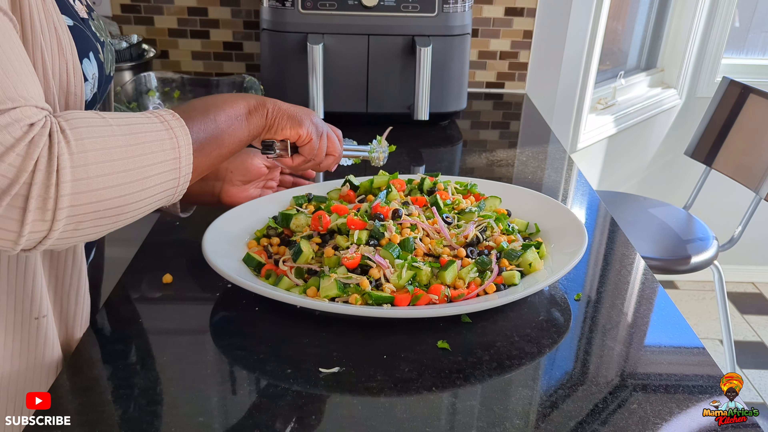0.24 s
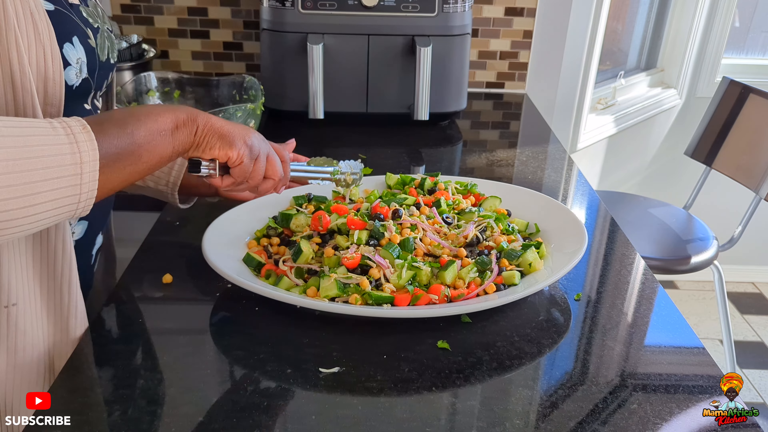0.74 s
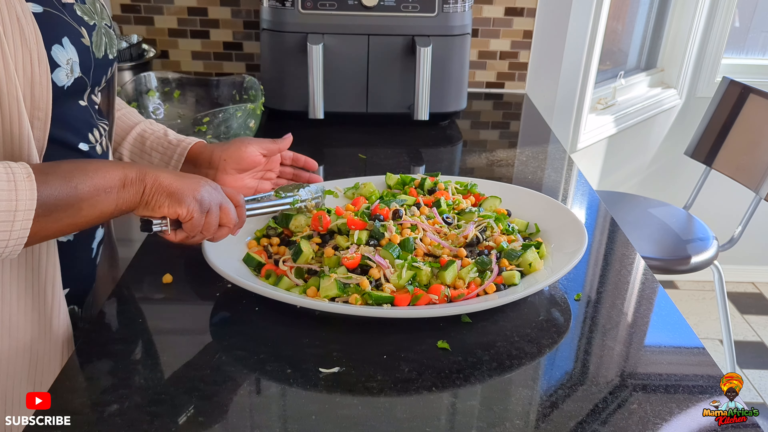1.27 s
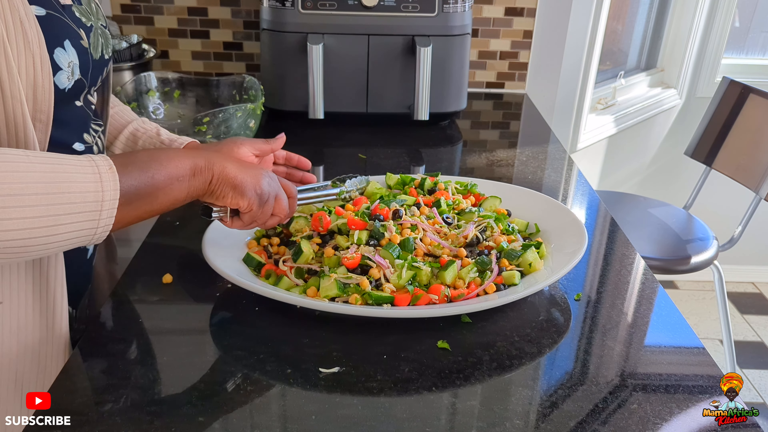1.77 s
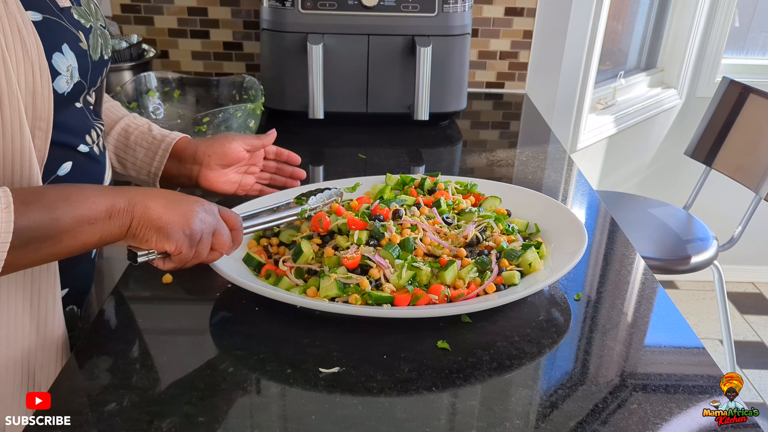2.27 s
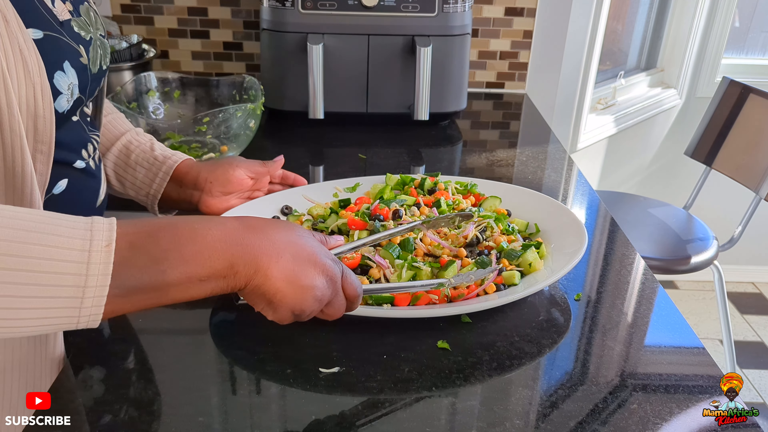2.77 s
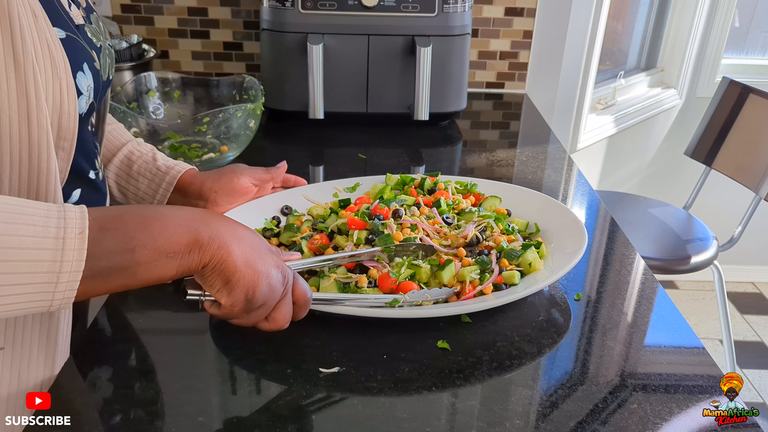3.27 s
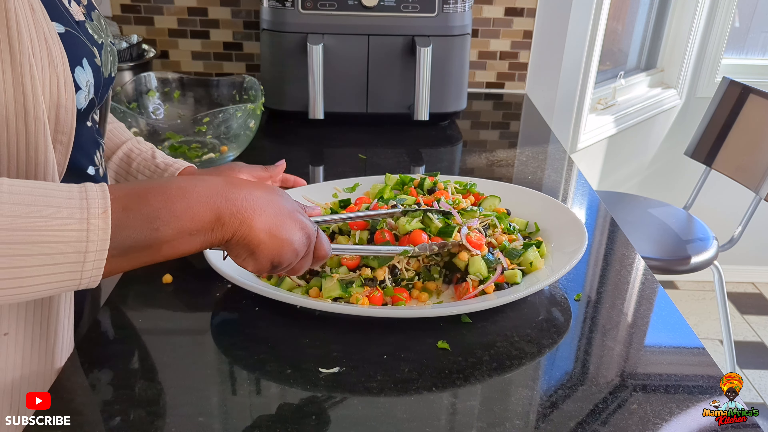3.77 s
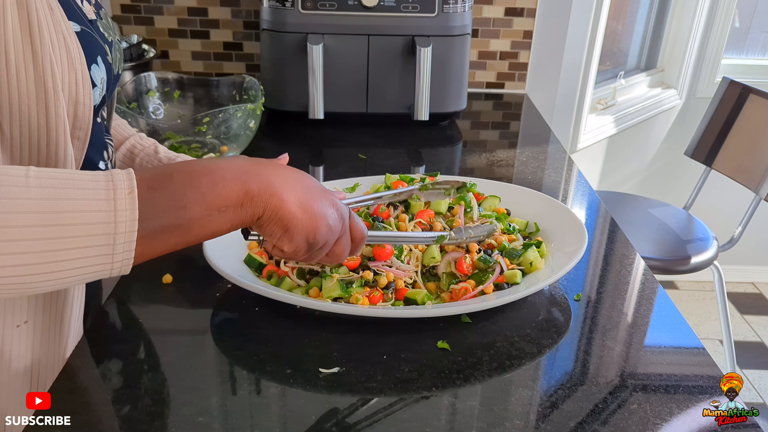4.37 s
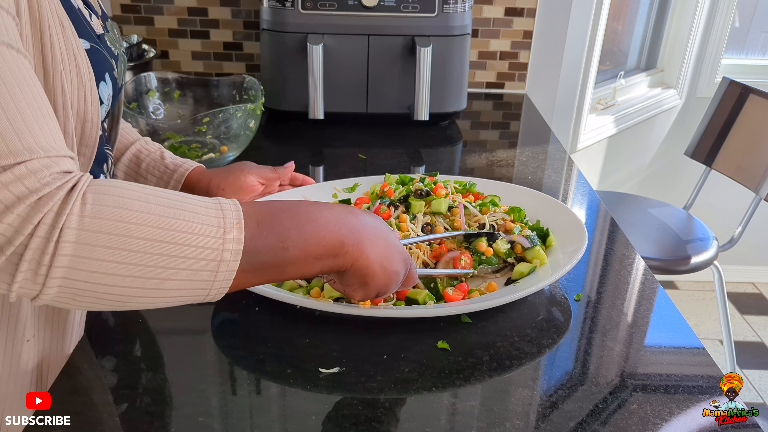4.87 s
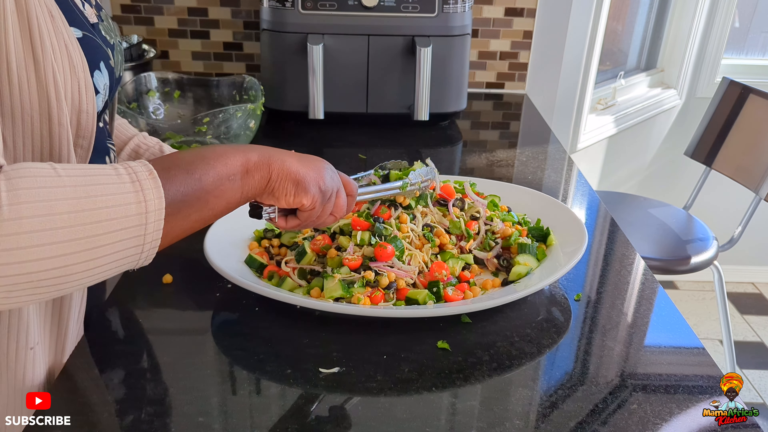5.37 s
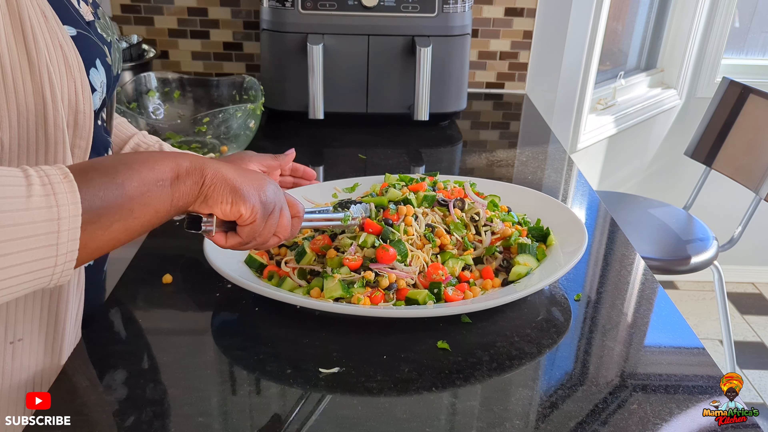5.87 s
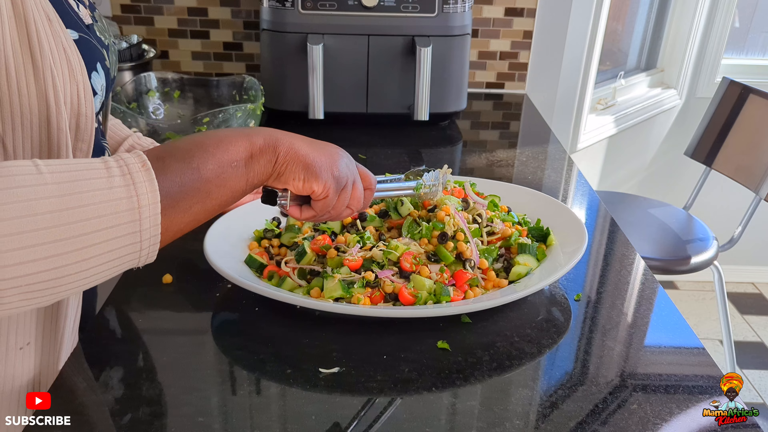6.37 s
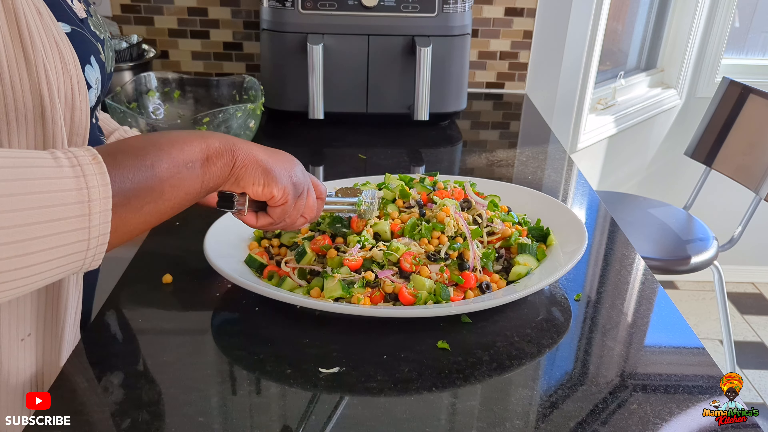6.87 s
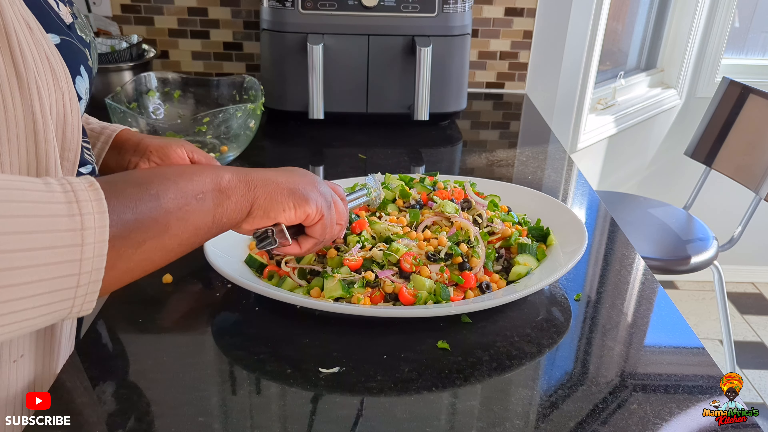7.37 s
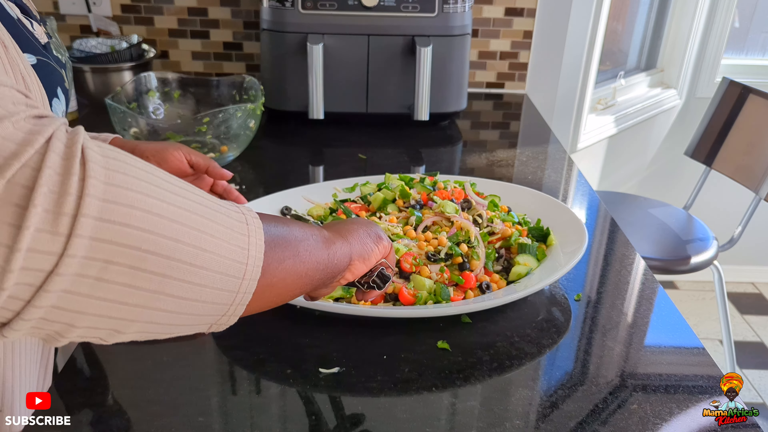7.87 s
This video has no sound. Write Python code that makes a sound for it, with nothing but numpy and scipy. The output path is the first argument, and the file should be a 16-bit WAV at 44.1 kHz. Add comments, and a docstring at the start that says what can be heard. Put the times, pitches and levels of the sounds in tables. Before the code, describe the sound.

Quiet kitchen rumble with sparse tong clicks and muted platter knocks, a sharp ceramic clank just after three seconds, then small ticks and rustles.

```python
"""A low household rumble and a faint hiss run throughout, while wet leaves rustle in short pushes of tiny ticks.
Steel tongs toss the salad on a ceramic platter in a hard-walled kitchen, close to the microphone.
Soft knocks on the platter are decaying tones plus a dull thud; tong clicks are noise bursts coloured by steel.
Once the tongs clank down hard, and now and then a wet vegetable squeaks: a short burst of noise around one pitch.
The room answers every knock and click with dense, quickly fading reflections."""
import sys
import numpy as np
from scipy import signal
from scipy.fft import rfft, irfft, next_fast_len
from scipy.io import wavfile
from scipy.ndimage import map_coordinates

SR = 44100
rng = np.random.default_rng(int(sys.argv[2]) if len(sys.argv) > 2 else 0)


def generate_wav(signal):
    """Clip the signal to [-1, 1] and save it as 16-bit WAV at the path in sys.argv[1]."""
    frames = np.transpose(np.atleast_2d(signal))
    scaled = np.clip(frames, -1, 1) * 32767
    pcm = np.round(scaled).astype(np.int16)
    wavfile.write(sys.argv[1], SR, pcm)


N = 358533

# Rise and fall of the rumble, before its overall boost and waver: [t/s, level/dB]
RUMBLE_LEVEL = [(0.0, -65), (0.36, -62), (1.04, -65), (1.63, -62), (2.29, -64), (2.4, -64), (2.58, -69.5),
                (3.46, -62), (3.82, -66), (6.2, -67), (6.59, -69.5), (7.36, -65), (7.74, -69),
                (8.13, -63.5)]
# Spectrum of the rumble, relative: [f/Hz, level/dB per Hz]
RUMBLE_SPECTRUM = [(15, -62), (25, -38), (33, -22), (42, -9), (56, 1), (76, -2.5), (102, -11.5),
                   (135, -3.5), (165, -15), (200, -18.5), (240, -13.5), (285, -30), (370, -27.5),
                   (500, -25), (1000, -81)]
# Spectrum of the faint steady hiss, relative: [f/Hz, level/dB per Hz]
HISS_SPECTRUM = [(180, -35), (300, -1), (331, -5.5), (398, -1), (614, -8), (678, -5), (915, -12),
                 (994, -9.5), (1530, -14.5), (2700, -18.5), (2980, -17), (11000, -28.5), (16000, -37.5)]
# How alike left and right are in sound from all around: [f/Hz, likeness/0 to 1]
LEFT_RIGHT_LIKENESS = [(60, .94), (250, .88), (600, 0.56), (1200, 0), (2500, 0), (5000, 0)]
# Time the room takes to fade by 60 dB: [f/Hz, fade time/s]
ROOM_FADE = [(150, .4), (700, .44), (2000, .45), (4500, .43), (8000, .36), (14000, .33)]

# The tongs push through the leaves or let them drop:
# [start t/s, length/s, rustle level/dB, crisp treble relative to the rustle/dB]
RUSTLES = [ (0.0, 0.076, -75, -37), (0.29, 0.17, -76, -11), (0.543, 0.077, -80, -34),
           (0.79, 0.04, -82, -11), (0.851, 0.023, -71.5, -7.5), (2.115, 0.081, -77, -7.5),
           (2.244, 0.051, -72, -18), (2.4, 0.18, -85.5, -20), (3.769, 0.034, -78.5, -20),
           (3.9, 0.41, -83, -22), (4.486, 0.1, -78.5, -12), (4.611, 0.14, -77.5, 5),
           (4.759, 0.12, -75.5, 6), (5.055, 0.088, -77.5, -7), (6.32, 0.15, -84, -12),
           (6.604, 0.22, -78.5, -7.5), (7.09, 0.069, -83.5, -12), (7.723, 0.013, -87.5, 3),
           (7.859, 0.079, -80, 0), (7.973, 0.11, -83.5, -7)]
# Spectrum of the rustling leaves, relative: [f/Hz, level/dB per Hz]
LEAF_SPECTRUM = [(500, 0.5), (900, -7), (1300, -8), (2100, 4.5), (2700, -3), (3400, -9), (4500, -6),
                 (5600, -9), (6500, -4.5), (7300, -16.5), (11000, -36), (15000, -52)]
# Spectrum of the crisp snaps, relative: [f/Hz, level/dB per Hz]
CRISP_SPECTRUM = [(5000, -20), (9000, -16.5), (13000, -18.5), (16000, -16.5)]

# The platter is struck, mostly cushioned by food:
# [t/s, level/dB, highest pitch the contact excites f/Hz, extra rim bending/dB]
KNOCKS = [(0.338, -65, 800, 9.5), (0.555, -62, 950, 20), (0.789, -56.5, 790, 8.5), (0.878, -62.5, 750, -3),
          (1.106, -67.5, 854, -2), (1.2365, -51.5, 8950, 2), (1.663, -48, 770, 3.5), (1.75, -54.5, 696, 12),
          (2.165, -63, 746, 3), (2.269, -63.5, 850, 8.5), (3.2795, -34.5, 1749, -2.5),
          (3.898, -68.5, 941, 0), (5.0437, -48.5, 1084, -2), (6.262, -58, 860, 2), (6.334, -65, 780, -3),
          (6.43, -73.5, 796, 2)]
# Ring of the ceramic platter, relative: [f/Hz, level/dB, time to fade by 60 dB/s]
PLATTER_MODES = [(172, -14, .2), (558, -12, .32), (641, -1.5, .24), (668, -6, .15), (893, 0, .23),
                 (1290, -7, .26), (1760, 1.5, .4), (2293, 9.8, .38), (2891, 9.8, .33), (3560, -5, .25),
                 (3967, -5, .24), (4953, 1, .38), (6223, 0, .18), (6611, -3, .32)]

# The tongs meet each other, the platter or crisp vegetables. Light contacts lack the lows, sharp ones
# tilt to the treble: [t/s, relative strength/dB, low edge f/Hz, tilt/dB per octave,
# flexing of the arms/dB, direct sound over room/dB, relative ring of the arms/dB]
CLICKS = [ (0.7957, -37.5, 600, -2, -3, -1, 7), (0.8868, -33.5, 400, -3, -5.5, 4.5, -8),
          (1.2359, -3.5, 326, 0.4, -6.5, 2, -27), (1.666, -44, 504, -3, -1, -8, 1),
          (1.7402, -15.5, 370, 0.6, -5, 1, 0.5), (3.2797, 12.5, 830, -2.5, -0.5, -3.5, 0.5),
          (3.3592, 2.5, 2800, -0.5, -5, 18, -13), (4.496, -43, 500, -4.5, -12, 9, -11),
          (4.5324, -35.5, 400, -1, -22, -3, -11), (4.629, -30, 3500, 3.5, -12, -4, 4),
          (4.787, -18.5, 3260, 2, -17, -14.5, -11), (5.8636, -4, 1560, 0.5, 4, 4, -7),
          (6.098, -38, 900, -1, -1.5, 0, -12), (6.6097, -32, 2800, -1, -7, 1.5, -15),
          (6.75, -35.5, 2010, -1.5, -5, 6, -1), (7.196, -39, 3500, -0.5, 1, -2, -10),
          (7.47, -23.5, 300, 8.5, -4, 2, -1), (8.1055, -38.5, 2980, 0, -8, -0.5, -5.5)]
# Broad resonances of the hand-damped tongs: [f/Hz, width/Hz, level/dB]
TONG_RESONANCES = [(930, 110, 2.5), (1100, 400, 4), (1406, 200, -7.5), (1720, 120, 7), (2123, 430, 14),
                   (2740, 140, 2), (3270, 260, 1.5), (4300, 150, 0.5), (5180, 1100, 0.5), (5320, 340, 4.5),
                   (6480, 1000, 7.5), (7200, 150, -5.5), (8240, 2400, 4), (10860, 190, 3.5),
                   (13600, 1200, 4)]
# Free ring of the steel arms, relative: [f/Hz, level/dB, time to fade by 60 dB/s]
ARM_MODES = [(1125, -5, .3), (1712, 1, .33), (1852, -3, .33), (1907, -2, .37), (2041, -2, .37),
             (2098, 1, .37), (2232, -3, .37), (2331, -4, .36), (2450, -7, .32), (2783, -9, .35),
             (2827, -6, .3), (3188, -3, .33), (3272, -4, .3), (3812, -6, .3), (4263, -3, .35),
             (4790, -6, .28), (4861, -4, .28), (5168, -6, .29), (5346, -4, .3), (5772, -6, .32),
             (6476, -6, .3), (7332, -2, .17), (8333, -5, .28)]
# Push of steel on something hard, shared by all clicks: [f/Hz, level/dB]
CONTACT_SPECTRUM = [(470, -0.5), (1050, -1), (2100, 0), (3200, 0), (4700, -0.5), (6300, -5), (8400, -6),
                    (12500, -11.5), (16000, -13.5)]

# A wet vegetable slips on the steel: [t/s, level/dB, pitch f/Hz]
SQUEAKS = [(2.234, -69, 2970), (2.29, -71, 2000), (4.631, -61.5, 3460)]

RUSTLE_ATTACK_S = 0.007  # the leaves start to slip
SETTLE_DB_PER_S, CRISP_SETTLE_DB_PER_S = 111, 170  # after a push the crisp snaps die away faster
SLIP_DB, SLIPS_PER_S = 2.5, 45  # the leaves stick and slip unevenly under the tongs
TILT_PIVOT_HZ = 4000  # the tilt of a click turns about this pitch
CHATTER_S = 0.003  # steel chatters on steel, fading with this time constant
FLEX_HZ, FLEX_OCTAVES = 1830, 0.24  # where the arms flex most easily: centre, half width
TOP_HZ = 15600  # highest pitch kept in the sound


def amp(db):
    """Turn decibels into a gain."""
    return 10 ** (np.asarray(db) / 20)


def unit(x):
    """Scale a sound to an rms of 1."""
    return x / np.sqrt(np.mean(x ** 2) + 1e-20)


def unit_energy(pair):
    """Scale a stereo sound to an average energy of 1 per channel."""
    return pair / np.sqrt(np.sum(pair ** 2) / 2)


def along(points, hz):
    """Read a curve of (Hz, value) points, spaced by pitch, at any frequency."""
    point_hz, value = np.transpose(points)
    return np.interp(np.log(hz + 1), np.log(point_hz + 1), value)


def filtered(x, response):
    """Multiply each frequency of x by the gain that response gives for it."""
    n = x.shape[-1]
    size = next_fast_len(n + SR // 5)
    gain = response(np.fft.rfftfreq(size, 1 / SR))
    return irfft(rfft(x, size) * gain, size)[..., :n]


def struck(x, colour_db, size=32768):
    """Colour a blow so that the body answers only after it, never before."""
    cepstrum = irfft(np.log(amp(colour_db(np.fft.rfftfreq(size, 1 / SR)))))
    # folding this onto positive time makes the filter minimum-phase
    cepstrum[1:size // 2] *= 2
    cepstrum[size // 2 + 1:] = 0
    response = np.exp(rfft(cepstrum))
    return irfft(rfft(x, size) * response)[..., :x.shape[-1]]


def diffuse(pair):
    """Blend two unrelated signals into sound from all around, alike left and right in the bass."""
    def mid_side_gains(hz):
        angle = np.arccos(np.clip(along(LEFT_RIGHT_LIKENESS, hz), -1, 1)) / 2
        return np.array([np.cos(angle), np.sin(angle)])

    mid, side = filtered(pair, mid_side_gains)
    return np.array([mid + side, mid - side])


def coloured(pair, spectrum):
    """Make diffuse stereo sound of rms 1 with the given spectrum."""
    return unit(filtered(diffuse(pair), lambda hz: amp(along(spectrum, hz))))


def add(track, s, sound):
    """Mix a sound into the track from time s, cutting it at the end of the track."""
    part = track[:, round(s * SR):][:, :sound.shape[1]]
    part += sound[:, :part.shape[1]]


def wobble(rate):
    """Draw a smooth random curve through this many random points a second."""
    return map_coordinates(rng.standard_normal(400), [np.arange(N) * rate / SR], mode="mirror")


def kitchen(build_s=0.0017):
    """The room's answer from one spot: dense reflections, each frequency dying at its own speed."""
    noise = diffuse(rng.standard_normal((2, SR * 2 // 3)))
    hz, t, bins = signal.stft(noise, SR, nperseg=256)
    fade = amp(-60 * t / along(ROOM_FADE, hz)[:, None])
    tail = signal.istft(bins * fade, SR, nperseg=256)[1]
    build_up = 1 - np.exp(-np.arange(tail.shape[1]) / SR / build_s)
    return unit_energy(tail * build_up)


def ring(modes, t, scatter_db, spread_hz):
    """Add up fading tones of random strength; higher ones differ more in phase left to right."""
    hz, db, fade_s = np.transpose(modes)[:, :, None]
    level, phase, skew = rng.standard_normal((3, len(modes), 1))
    skew = skew * np.minimum(hz / spread_hz, 1)
    fade = amp(db + scatter_db * level - 60 * t / fade_s)
    turns = 2 * np.pi * (hz * t + phase)
    return np.array([np.sum(fade * np.sin(turns + side * skew), axis=0) for side in (-1, 1)])


def house(rumble_db=2, waver_db=0.7, waver_per_s=7, hiss_db=-77):
    """A low wavering rumble and a faint even hiss, both shaped from noise, fill the kitchen."""
    times, levels = np.transpose(RUMBLE_LEVEL)
    level_db = np.interp(np.arange(N) / SR, times, levels) + rumble_db
    level_db = level_db + waver_db * wobble(waver_per_s)
    rumble = amp(level_db) * coloured(rng.standard_normal((2, N)), RUMBLE_SPECTRUM)
    hiss = amp(hiss_db) * coloured(rng.standard_normal((2, N)), HISS_SPECTRUM)
    return rumble + hiss


def push(start_s, length_s, settle_db_per_s):
    """Loudness of one push through the leaves: a quick rise, a hold, then they settle."""
    t = np.arange(N) / SR - start_s
    rise = np.clip(t / RUSTLE_ATTACK_S, 0, 1)
    return rise * amp(-settle_db_per_s * np.maximum(t - length_s, 0))


def salad(grains_per_s=900, spread_db=5.0, direct_db=-5):
    """Wet leaves slip and snap in dense tiny ticks of many sizes, blurred by the room."""
    happens = rng.random(N) < grains_per_s / SR
    size = amp(spread_db * np.minimum(rng.exponential(size=N), 4))
    ticks = happens * rng.choice([-1, 1], N) * size
    ticks = ticks * amp(SLIP_DB * wobble(SLIPS_PER_S))
    rustle, crisp = np.zeros((2, N))
    for s, length_s, db, crisp_db in RUSTLES:
        rustle += amp(db) * push(s, length_s, SETTLE_DB_PER_S)
        crisp += amp(db + crisp_db) * push(s, length_s, CRISP_SETTLE_DB_PER_S)
    blurred = signal.fftconvolve(ticks[None], kitchen(), axes=1)[:, :N]
    grains = amp(direct_db) * ticks + blurred
    leaves = unit(filtered(grains, lambda hz: amp(along(LEAF_SPECTRUM, hz))))
    snaps = unit(filtered(grains, lambda hz: amp(along(CRISP_SPECTRUM, hz))))
    return rustle * leaves + crisp * snaps


def platter(attack_cycles=1, thud_db=-3, thud_s=0.0086):
    """Food cushions the blow, so soft knocks wake mainly the lower tones, with a short dull thud."""
    out = np.zeros((2, N))
    thud_colour = [(100, -26.0), (350, -5.5), (650, -1), (1000, -3), (3000, -19.0)]  # Hz, dB
    for s, db, contact_hz, rim_db in KNOCKS:
        room = kitchen()
        t = np.arange(room.shape[1]) / SR
        cushion_db = lambda hz: -20 * np.log10(1 + np.minimum(hz / contact_hz, 4) ** 7)
        # rim bending acts on the tone between 500 and 600 Hz
        modes = [(hz, level + cushion_db(hz) + rim_db * (500 < hz < 600), fade_s)
                 for hz, level, fade_s in PLATTER_MODES]
        rise = 1 - np.exp(-t * contact_hz / attack_cycles)
        tone = ring(modes, t, scatter_db=2.38, spread_hz=3500) * rise
        noise = diffuse(rng.standard_normal(room.shape))
        thud = struck(noise, lambda hz: along(thud_colour, hz) + cushion_db(hz))
        thud = amp(thud_db) * unit(thud) * np.exp(-t / thud_s) * rise
        # the thud and the first few cycles set the room going
        start = tone * np.exp(-t / .005) + thud
        echo = signal.fftconvolve(start, room, axes=1)[:, :len(t)]
        add(out, s, amp(db) * (tone + thud + .5 * echo))
    return out


def steel_colour(overtones_db, spacing_hz):
    """Broad resonances of steel, with a thicket of fine overtones that grows towards the treble."""
    knots = rng.standard_normal(2000)

    def colour_db(hz):
        broad = sum(db / (1 + (2 * (hz - centre) / width) ** 2) for centre, width, db in TONG_RESONANCES)
        fine = np.tanh(map_coordinates(knots, [hz / spacing_hz], mode="mirror"))
        growth = np.minimum(hz / 3500, 1) ** 2
        return broad + overtones_db * (fine - .4) * growth
    return colour_db


def force_db(hz, strength_db, edge_hz, tilt, flex_db):
    """Spectrum of one contact: shared push, tilt by sharpness, low cut, and a change where the arms flex."""
    hz = np.maximum(hz, edge_hz / 2.5)  # the curve stays level below this pitch
    low_cut_db = -10 * np.log10(1 + (edge_hz / hz) ** 4)
    tilt_db = tilt * np.log2(hz / TILT_PIVOT_HZ)
    flex = np.exp(-.5 * (np.log2(hz / FLEX_HZ) / FLEX_OCTAVES) ** 2)
    return strength_db + along(CONTACT_SPECTRUM, hz) + tilt_db + low_cut_db + flex_db * flex


def tongs(snap=4.4, beam_db=6, ring_db=-48, attack_s=0.0024):
    """Each contact is a snap and a few ms of chatter, coloured by the steel and answered by the room."""
    out = np.zeros((2, N))
    steel_db = steel_colour(overtones_db=5.5, spacing_hz=66)
    for s, strength_db, edge_hz, tilt, flex_db, direct_db, arms_db in CLICKS:
        room = kitchen()
        t = np.arange(room.shape[1]) / SR
        direct = diffuse(rng.standard_normal(room.shape)) * np.exp(-t / CHATTER_S)
        direct[[0, 1], [0, 4]] += 2 * snap  # left is a little nearer: right comes 4 samples later
        # treble travels straight to the microphone, while lower pitches spread into the room
        direct = struck(unit_energy(direct), lambda hz: along([(2000, -7.5), (6000, beam_db - 6)], hz))
        blow = unit_energy(amp(direct_db) * direct + room)
        force = lambda hz: force_db(hz, strength_db, edge_hz, tilt, flex_db)
        click = struck(blow, lambda hz: force(hz) + steel_db(hz))
        # each tone of the arms rings on in proportion to the blow at its pitch
        modes = [(hz, db + force(hz), fade_s) for hz, db, fade_s in ARM_MODES]
        arms = ring(modes, t, scatter_db=1.0, spread_hz=9300)
        arms = arms * (1 - np.exp(-t / attack_s))
        add(out, s, click + amp(arms_db + ring_db) * arms)
    return out


def squeaks(width_hz=700, attack_s=0.0023, fade_s=0.053):
    """A wet vegetable slips unevenly on steel: noise around one pitch that swells quickly and fades."""
    out = np.zeros((2, N))
    t = np.arange(SR // 3) / SR
    swell = (1 - np.exp(-t / attack_s)) * np.exp(-t / fade_s)
    for s, db, pitch_hz in SQUEAKS:
        noise = rng.standard_normal((2, len(t)))
        slips = filtered(noise, lambda hz: 1 / (1 + (2 * (hz - pitch_hz) / width_hz) ** 2))
        add(out, s, amp(db) * unit(slips) * swell)
    return out


def scene():
    """Add salad, platter, tongs and squeaks to the room's own sound."""
    return house() + salad() + platter() + tongs() + squeaks()


def record(dry):
    """Remove nearly everything above the top pitch."""
    return filtered(dry, lambda hz: 1 / np.sqrt(1 + (hz / TOP_HZ) ** 160))


dry = scene()
out = record(dry)
generate_wav(out)
```